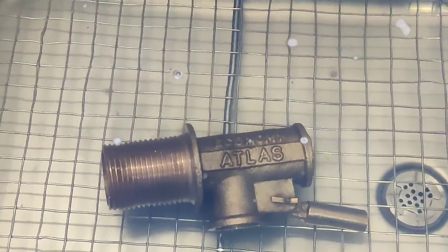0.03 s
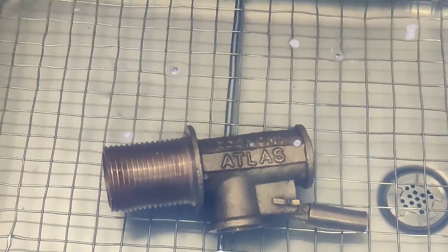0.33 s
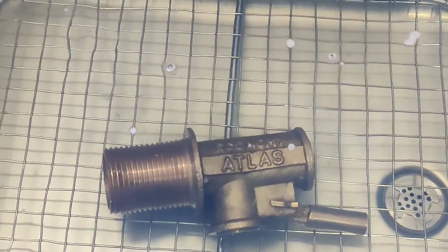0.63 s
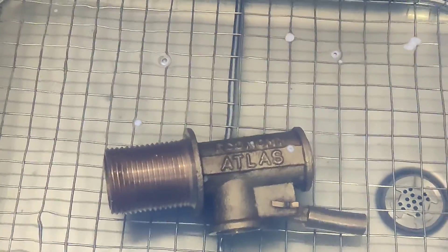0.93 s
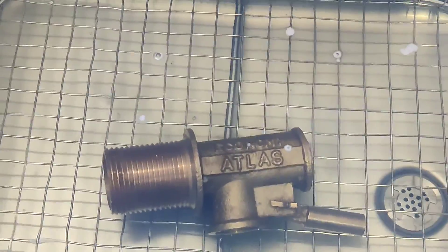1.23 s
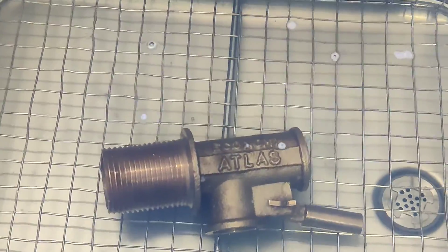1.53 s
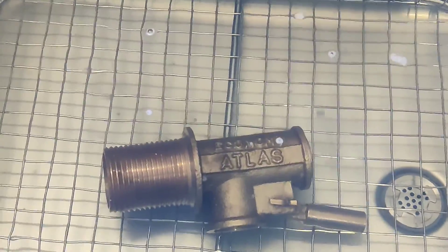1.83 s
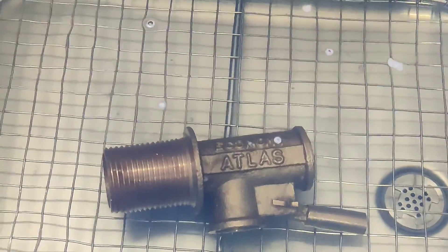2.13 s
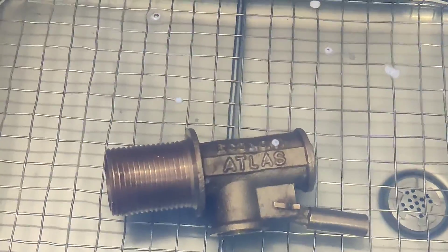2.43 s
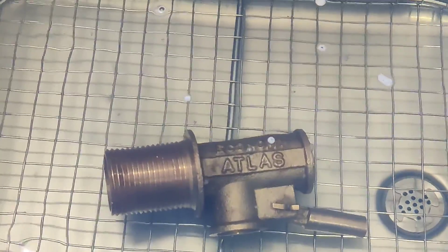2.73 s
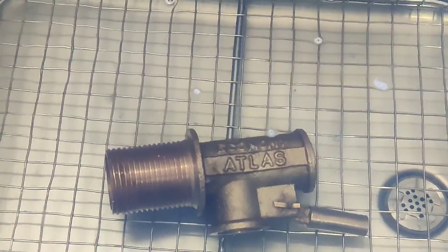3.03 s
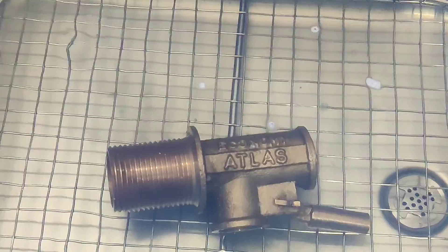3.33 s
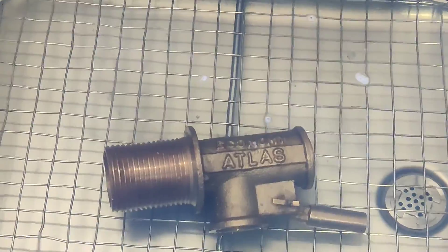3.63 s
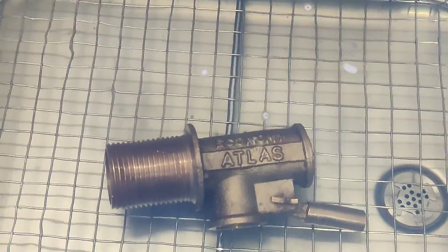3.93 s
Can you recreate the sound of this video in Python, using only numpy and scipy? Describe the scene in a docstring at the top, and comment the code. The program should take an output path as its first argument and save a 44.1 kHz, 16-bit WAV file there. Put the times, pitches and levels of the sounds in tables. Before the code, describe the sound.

An ultrasonic cleaner buzzes with a warble and a hiss, with one low thump.

```python
"""An ultrasonic cleaner buzzes, its steel tank full of liquid, close under a stereo microphone.
Its drive pulses with the mains and sweeps about 300 times a second across the tank's resonances;
each microphone port rectifies the loud ultrasound into a warbling buzz. Cavitation hisses above
it, the room rumbles below. One low thump on the left port makes the recorder's gain control duck."""
import sys
import numpy as np
from scipy import signal
from scipy.fft import rfft, irfft
from scipy.io import wavfile
from scipy.ndimage import uniform_filter1d, minimum_filter1d, map_coordinates

SR = 44100
rng = np.random.default_rng(int(sys.argv[2]) if len(sys.argv) > 2 else 0)


def to_wav(sig):
    """Store sig (one row per channel, or 1-D mono) as 16-bit WAV at the path in sys.argv[1].

    Samples outside -1..1 are clipped; the rate is SR.
    """
    pcm = np.clip(np.atleast_2d(sig), -1, 1) * 32767
    pcm = np.round(pcm).astype(np.int16)
    wavfile.write(sys.argv[1], SR, pcm.T)  # frames by channels


N = 176400
TIME_S = np.arange(N) / SR


def amp(db):
    """Decibels to gain."""
    return 10 ** (np.asarray(db) / 20)


def curves(rows):
    """One value per sample for each column after the time."""
    times_s, *columns = np.transpose(rows)
    return [np.interp(TIME_S, times_s, column) for column in columns]


def wobble(knots_per_s):
    """Smooth random curve of about unit size."""
    knots = rng.standard_normal(int(N * knots_per_s / SR) + 4)
    return map_coordinates(knots, [TIME_S * knots_per_s])


def filtered(x, response):
    """x times a response of frequency, its ends mirrored."""
    mirrored = np.concatenate([x, x[..., ::-1]], axis=-1)
    return irfft(rfft(mirrored) * response(np.fft.rfftfreq(2 * N, 1 / SR)), 2 * N)[..., :N]


def coloured(x, points):
    """x shaped by (Hz, dB) points on a log axis."""
    points_hz, db = np.transpose(points)
    return filtered(x, lambda hz: amp(np.interp(np.log(hz + 1), np.log(points_hz + 1), db)))


def noise(points):
    """Noise with a spectrum of (Hz, dB per Hz) points."""
    return coloured(rng.standard_normal(N) * np.sqrt(SR / 2), points)


# Each row: frequency in Hz, density in dB per Hz.
RUMBLE_SPECTRUM = [(10, -61), (35, -53.5), (70, -58), (150, -76), (400, -65), (1500, -100)]


def room_rumble():
    """Low room noise, the same at both ports."""
    return noise(RUMBLE_SPECTRUM)


def thump(start_s=0.9555, gain_db=19.5, decay_s=0.023, swing_back_s=0.04):
    """A sudden push of pressure on the left port swings back and dies."""
    age_s = np.maximum(TIME_S - start_s, 0)
    push = amp(gain_db) * age_s / decay_s * (1 - age_s / swing_back_s) * np.exp(-age_s / decay_s)
    return np.array([push, np.zeros(N)])


# Hiss at each port. Each row: frequency in Hz, density in dB per Hz before gain_db.
LEFT_HISS_SPECTRUM = [(300, -61.5), (1200, -62), (2000, -71.5), (3000, -76), (3500, -81), (4300, -81.5),
                      (5200, -78), (6200, -71.5), (6700, -91), (7400, -74.5), (8250, -71.5), (8700, -95),
                      (9700, -97), (10500, -77.5), (11300, -78), (12300, -86), (13500, -86), (14700, -76),
                      (15200, -84)]
RIGHT_HISS_SPECTRUM = [(300, -66), (1200, -65.5), (2000, -70.5), (3300, -78), (4400, -71.5), (5100, -65),
                       (5700, -70.5), (6100, -72.5), (6270, -59), (6450, -72), (6850, -69), (7600, -85),
                       (8250, -92), (8700, -75.5), (9600, -82), (10300, -75.5), (11400, -71), (11900, -76),
                       (12300, -88), (13500, -81), (14700, -80), (15200, -84)]


def cavitation(gain_db=2, sway_db=0.8, pulse_depth=0.099):
    """Countless collapsing bubbles hiss, pulsing faintly with the drive."""
    level = amp(gain_db + sway_db * wobble(knots_per_s=18))
    pulsing = 1 + pulse_depth * (2 * mains_pulses(lag_s=0.0019) - 1)
    return level * pulsing * np.array([noise(LEFT_HISS_SPECTRUM), noise(RIGHT_HISS_SPECTRUM)])


MAINS_PULSE_HZ = 99.933


def mains_pulses(lag_s, narrowness=2.07):
    """Drive power, 0 to 1: one pulse per half wave of the mains."""
    return np.abs(np.sin(np.pi * MAINS_PULSE_HZ * (TIME_S - lag_s))) ** narrowness


def warble(rate_hz=8.3196, top_s=0.1326):
    """The drive's slow triangular modulation, -1 to 1."""
    return signal.sawtooth(2 * np.pi * rate_hz * (TIME_S - top_s) + np.pi, 0.5)


def sweep(lead_cycles, mean_rate_hz=299.553, warble_depth_hz=16.414, mains_pull_hz=8):
    """The drive's place in its frequency sweep, -1 to 1; the rate warbles and rises with each pulse."""
    ripple = -np.cos(2 * np.pi * MAINS_PULSE_HZ * TIME_S) / 2
    rate_hz = mean_rate_hz + warble_depth_hz * warble() + mains_pull_hz * ripple
    return np.cos(2 * np.pi * (np.cumsum(rate_hz) / SR + lead_cycles))


# Two resonances per port drift as the standing waves shift. Each row: time in seconds,
# first one's place in half sweeps from mid-sweep, its relative level in dB, the same for the second.
LEFT_RESONANCES = [(0.0, -0.55, -11, 0.29, -2.5), (0.25, -0.41, -6.5, 0.22, -2.5),
                   (0.5, -0.52, -4.5, 0.14, -1), (0.75, -0.37, -6, 0.18, -11.5),
                   (0.95, -0.46, -4, 0.18, -3.5), (1.25, -0.47, -7, 0.28, -1), (1.55, -0.48, -9, 0.24, -4),
                   (1.8, -0.49, -8.5, 0.24, 1), (2.0, -0.5, -14.5, 0.32, -2), (2.25, -0.63, -12, 0.28, -1),
                   (2.5, -0.48, -7.5, 0.27, 0.2), (2.8, -0.51, -6, 0.21, -1), (3.1, -0.44, -6.5, 0.2, -3),
                   (3.35, -0.28, -2.5, 0.43, -4.5), (3.65, -0.43, -5, 0.33, -1.5),
                   (4.0, -0.29, -1.5, 0.46, 1)]
RIGHT_RESONANCES = [(0.0, 0.97, -3.5, -0.25, -11.5), (0.25, 0.96, -6, -0.69, -17),
                    (0.5, 0.99, -2.4, -0.59, -13), (0.75, 0.83, -4, -0.64, -10.5),
                    (0.95, 0.98, -2.3, -0.29, -9.5), (1.25, 1.2, -0.5, -0.41, -7),
                    (1.55, 0.96, -8, -0.41, -10), (1.8, 0.95, -3, -0.47, -5.5),
                    (2.0, 0.95, -5.5, -0.47, -11.5), (2.25, 0.91, -5.5, -0.52, -9.5),
                    (2.5, 0.86, -5, -0.59, -11), (2.8, 0.99, -5.5, -0.7, -15), (3.1, 0.99, -4, -0.67, -14),
                    (3.35, 0.94, -3.5, -0.61, -13.5), (3.65, 0.95, -5.5, -0.6, -13),
                    (4.0, 1.06, -4.5, -0.63, -13)]
# Throb common to both ports. Each row: time in seconds, swing in dB (positive: louder at warble top).
SHARED_THROB = [(0, -2.5), (.3, -0.2), (.6, -1.7), (.9, -3), (1.5, -1.5), (1.93, -2.5), (2.0, -4.5),
                (2.3, -4.5), (2.45, -2), (4, 0)]
# Tone of the buzz. Each row: frequency in Hz, gain in dB.
BUZZ_RESPONSE = [(15, -41), (50, 0), (100, -0.5), (200, 3.5), (300, 2), (450, -6.5), (600, 2), (720, 1),
                 (880, 4), (1050, 0), (1200, 1), (1350, -3), (1500, -2.5), (2000, -23.5), (3000, -21)]


def buzz(resonances, widths, shift, lag_s, lead_cycles, throb_db, sway_db=0.6, flutter_depth=0.035):
    """Ultrasound rectified at one port flares as the sweep crosses a resonance; bubbles flutter it."""
    place = sweep(lead_cycles) + shift * warble()  # place, shift and widths in half sweeps
    swing_db = (throb_db + curves(SHARED_THROB)[0]) * warble()
    drift = curves(resonances)
    intensity = 0
    for centre, level_db, width in zip(drift[::2], drift[1::2], widths):
        level = amp(level_db + swing_db + sway_db * wobble(knots_per_s=9))
        flutter = 1 + flutter_depth * wobble(knots_per_s=350)
        intensity += level * flutter * np.exp(-((place - centre) / width) ** 2)
    return coloured(-intensity * mains_pulses(lag_s), BUZZ_RESPONSE)


def scene():
    """Buzz, hiss, thump and room noise at the two ports."""
    left = buzz(LEFT_RESONANCES, widths=(0.3, 0.43), shift=0.079,
                lag_s=0.0004, lead_cycles=0.021, throb_db=3.05)
    right = buzz(RIGHT_RESONANCES, widths=(0.42, 0.42), shift=-0.061,
                 lag_s=-0.00064, lead_cycles=0.075, throb_db=0.24)
    return np.array([left, right]) + cavitation() + thump() + room_rumble()


CEILING_DB, HOLD_S, RELEASE_DB_PER_S, BAND_LIMIT_HZ = -1.5, 0.053, 18, 15200


def record(dry):
    """Gain control ducks both channels at a peak, holds and recovers slowly; then the band limit."""
    peak_db = 20 * np.log10(np.abs(dry).max(axis=0) + 1e-9)
    needed_db = np.minimum(CEILING_DB - peak_db, 0)
    hold_samples = int(HOLD_S * SR)
    held_db = minimum_filter1d(needed_db, size=hold_samples, origin=(hold_samples - 1) // 2)
    release_db = RELEASE_DB_PER_S * TIME_S
    gain_db = np.minimum.accumulate(held_db - release_db) + release_db
    smooth_gain = uniform_filter1d(minimum_filter1d(amp(gain_db), size=256), size=256)
    return filtered(dry * smooth_gain, lambda hz: hz < BAND_LIMIT_HZ)


dry = scene()
out = record(dry)
to_wav(out)
```